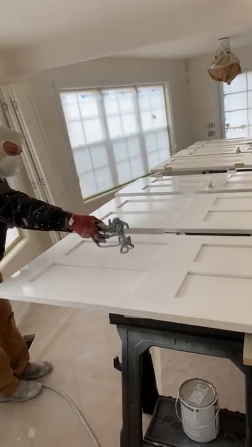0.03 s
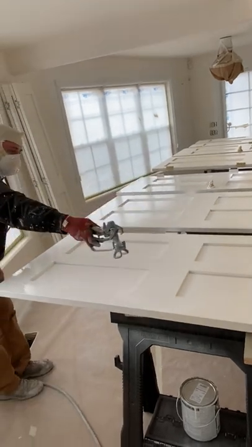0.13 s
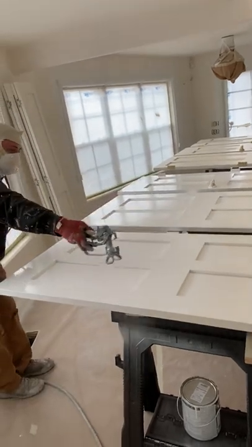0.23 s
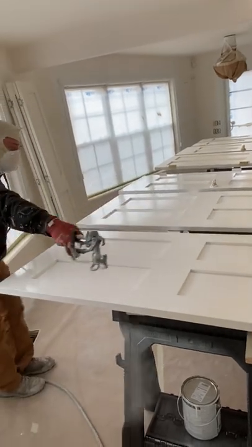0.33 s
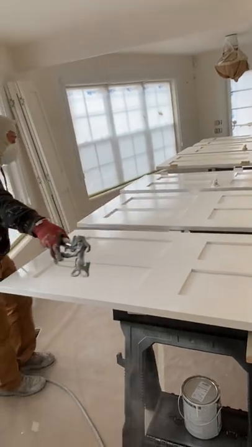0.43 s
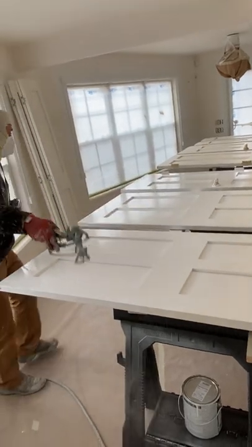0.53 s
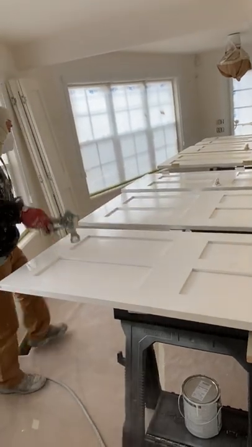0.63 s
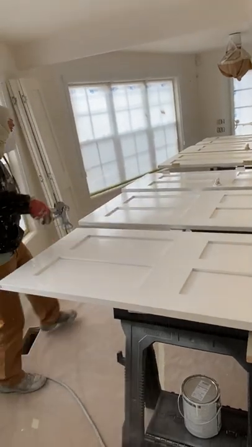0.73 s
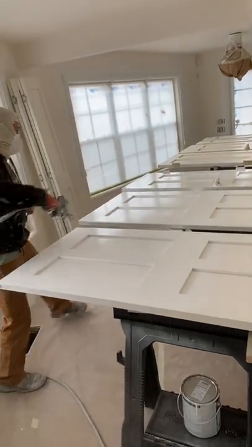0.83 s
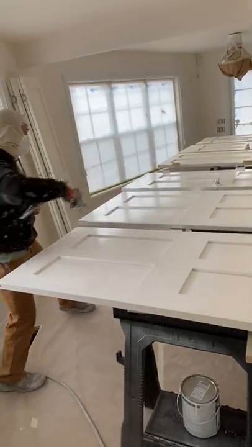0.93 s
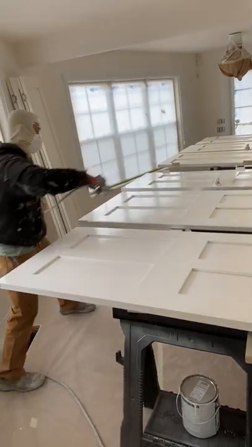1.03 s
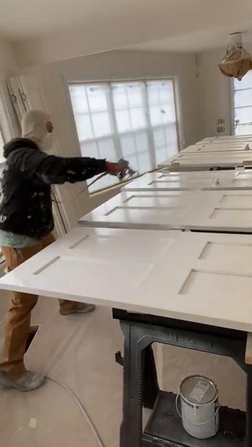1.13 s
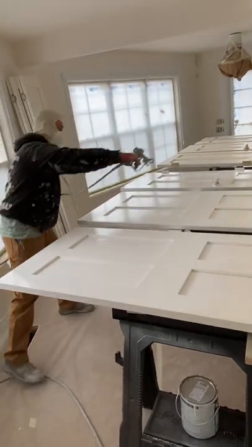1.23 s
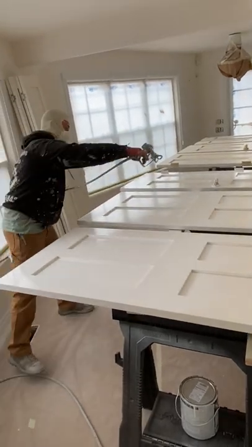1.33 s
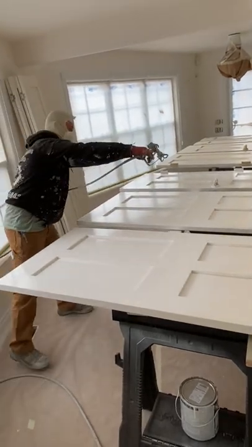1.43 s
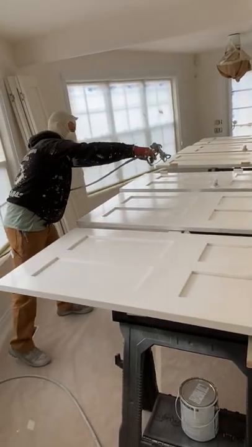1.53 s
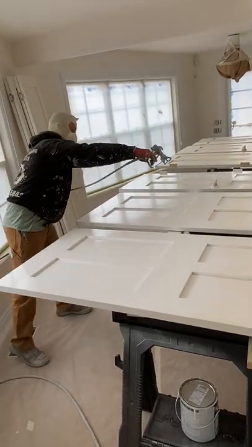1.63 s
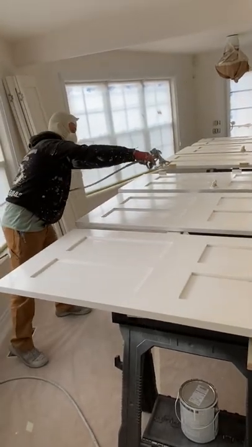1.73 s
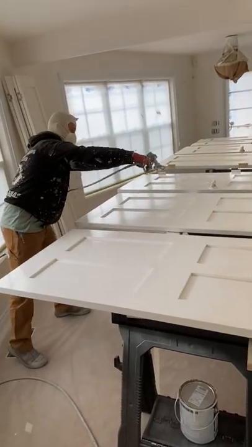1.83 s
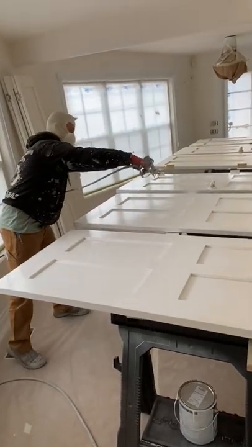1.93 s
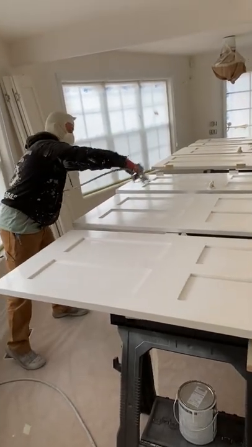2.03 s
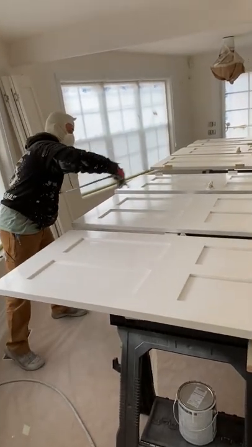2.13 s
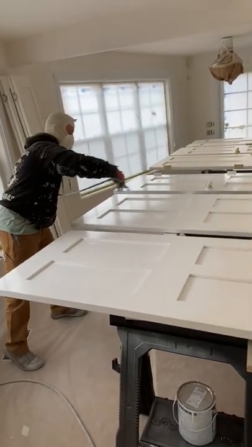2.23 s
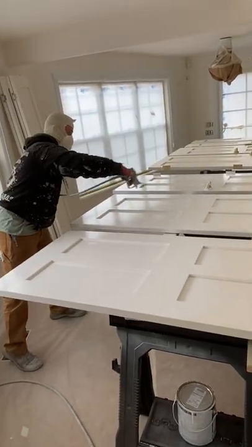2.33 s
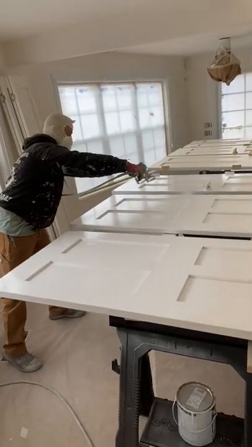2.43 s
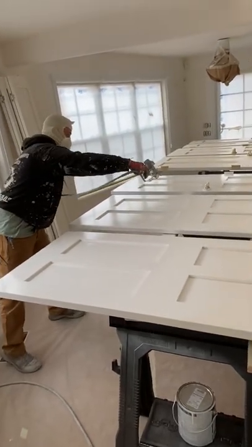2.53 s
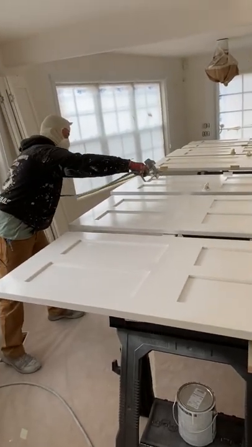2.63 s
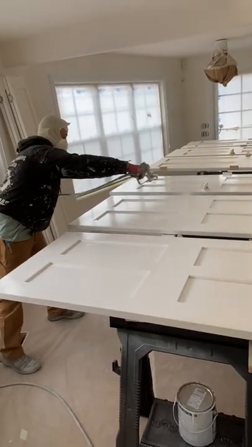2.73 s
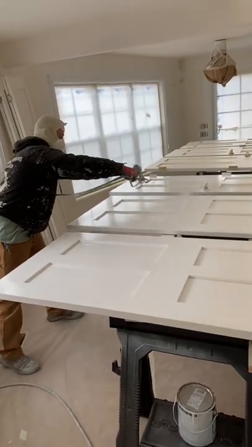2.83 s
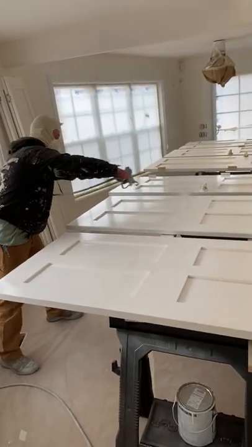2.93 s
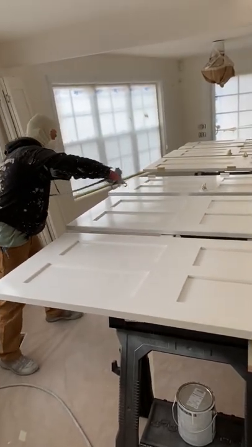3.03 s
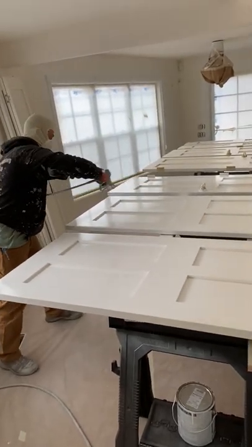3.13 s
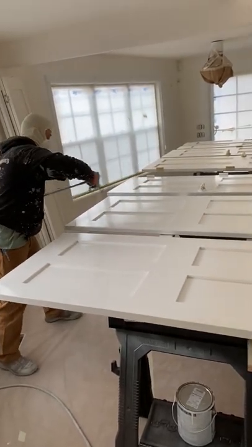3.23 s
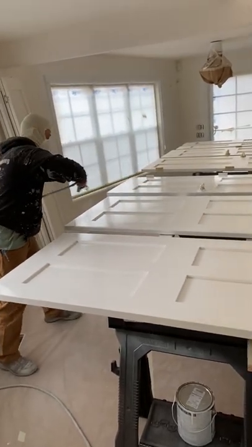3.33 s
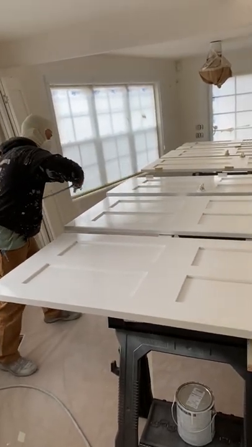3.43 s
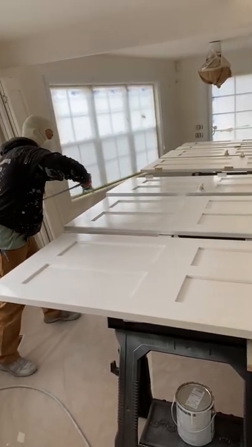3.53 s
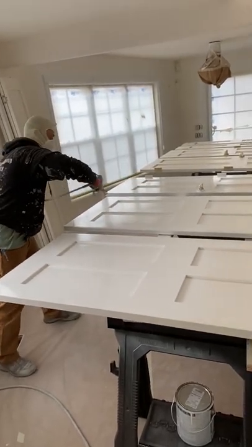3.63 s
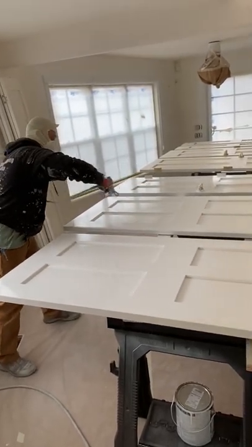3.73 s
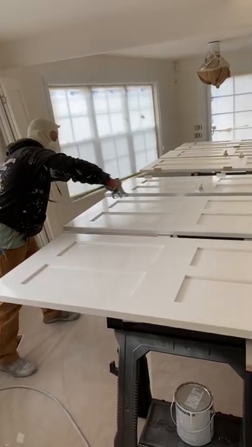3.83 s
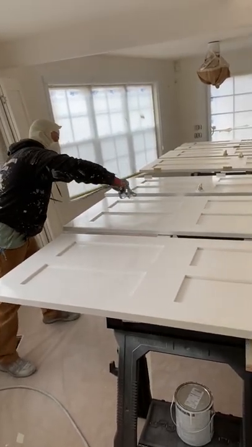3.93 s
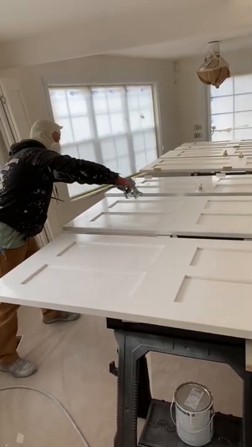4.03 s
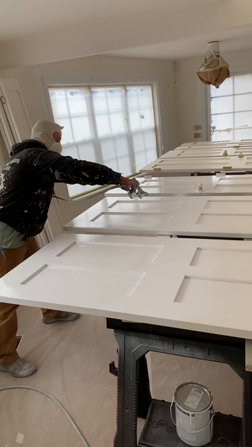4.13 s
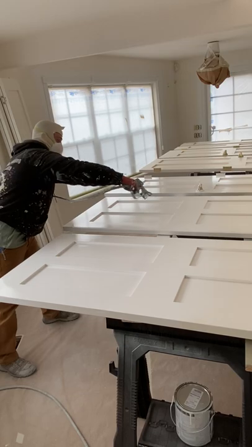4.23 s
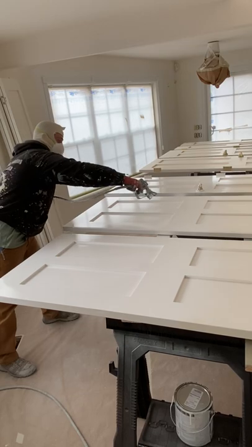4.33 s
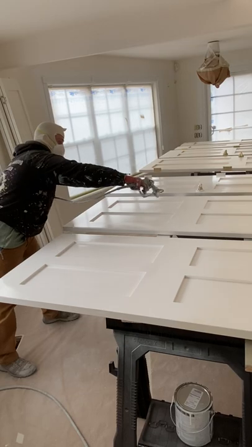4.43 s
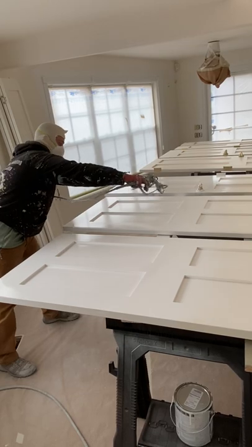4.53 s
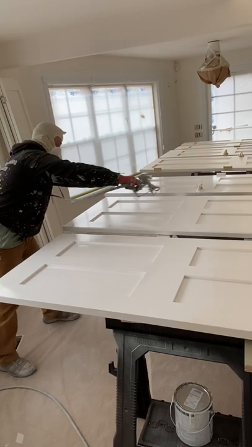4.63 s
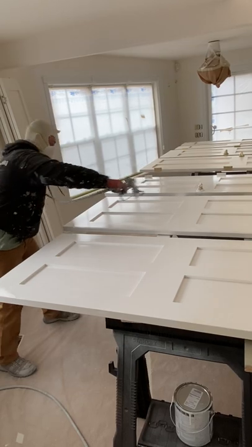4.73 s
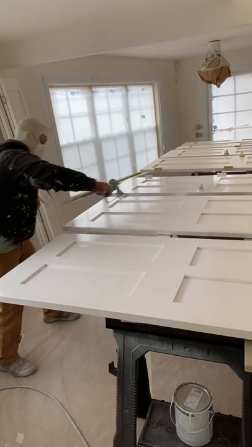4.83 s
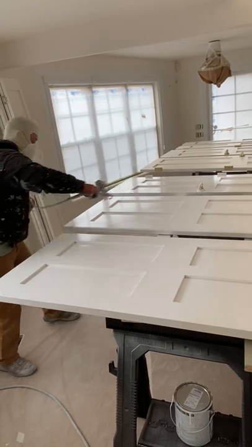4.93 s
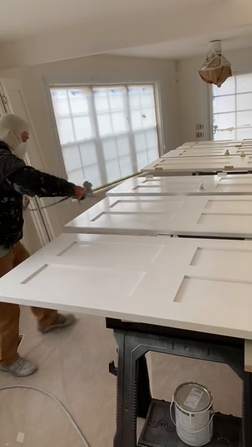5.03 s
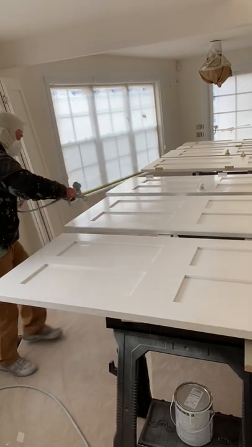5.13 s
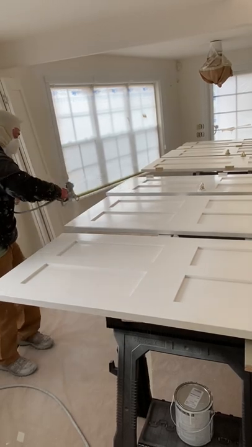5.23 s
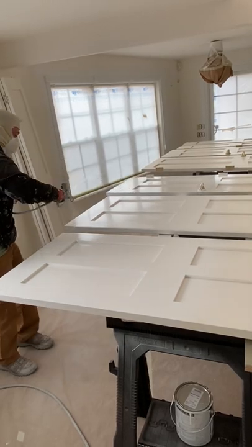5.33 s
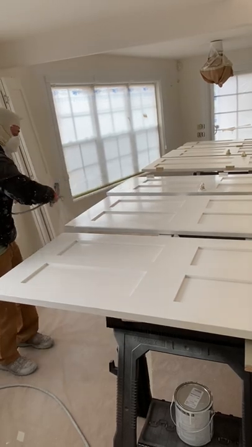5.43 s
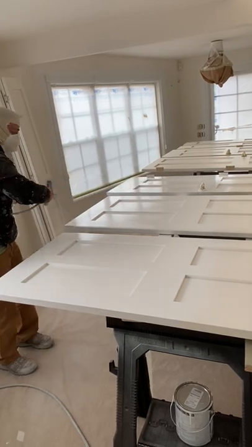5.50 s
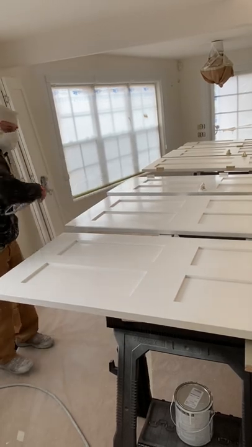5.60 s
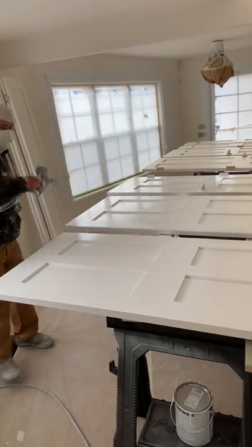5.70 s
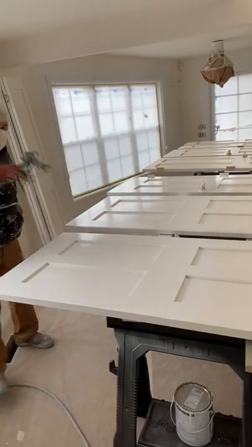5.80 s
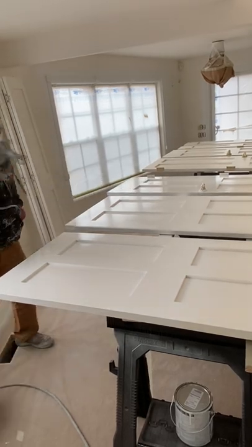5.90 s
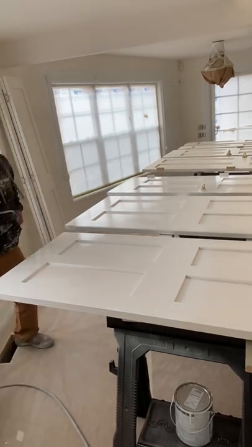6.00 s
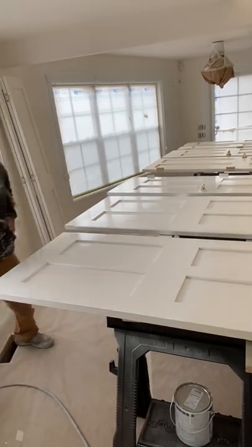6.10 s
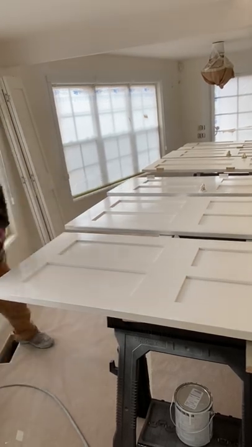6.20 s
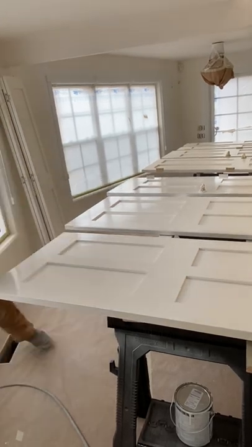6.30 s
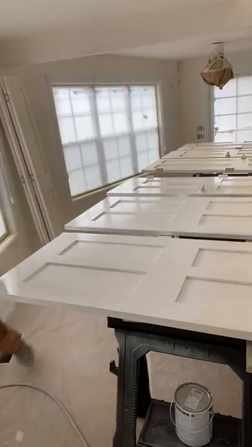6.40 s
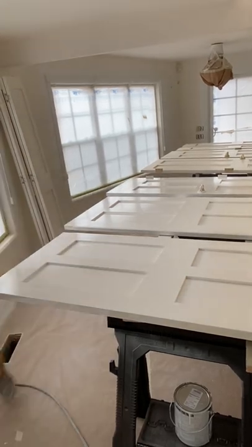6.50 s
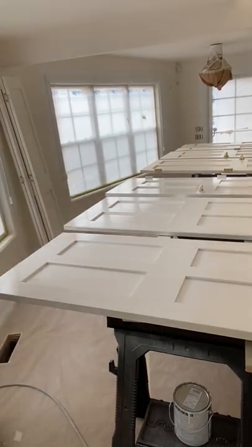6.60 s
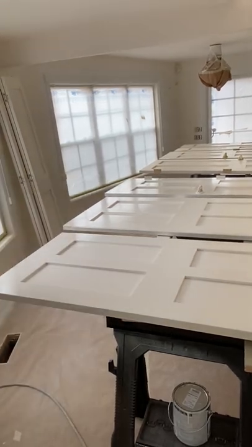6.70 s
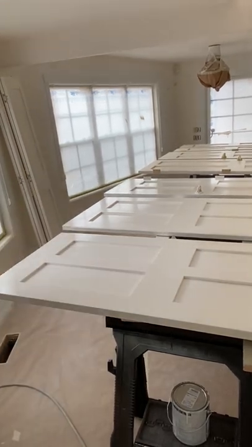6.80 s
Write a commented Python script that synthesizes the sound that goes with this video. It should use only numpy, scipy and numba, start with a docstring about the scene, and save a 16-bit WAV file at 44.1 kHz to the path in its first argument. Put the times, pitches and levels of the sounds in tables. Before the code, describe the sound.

A worker spray-paints doors laid on trestles. A brief airy hiss stops, giving way to low boot thumps, scraping soles, clicks and papery rustling. The gun then hisses steadily in three pulls of about a second or less, fluttering slightly and ringing briefly off the walls. Afterwards come falling hose swishes, thuds and ticks over faint room air, heard in stereo from a few metres.

```python
"""An airless spray gun sweeps over doors on trestles in a bare room, a few metres from a two-port microphone.
The fan of paint is turbulent noise with droplet grains, heard while the trigger is held. Boots thud as sagging
tones with floor modes; soles and hose scuff as dense grains, paper and cloth rustle as lighter ones.
Ticks are noise through a resonance, swishes are noise in sliding bands, over a bed of room air.
The hard walls ring on after the spray, the thuds and the ticks."""
import sys
import numpy as np
from scipy import signal
from scipy.fft import rfft, irfft
from scipy.io import wavfile
from scipy.ndimage import uniform_filter1d
from numba import njit

SR = 44100
rng = np.random.default_rng(int(sys.argv[2]) if len(sys.argv) > 2 else 0)


def write(x):
    x = np.atleast_2d(x).T
    wavfile.write(sys.argv[1], SR, np.round(np.clip(x, -1, 1) * 32767).astype(np.int16))


N = 302526
T = np.arange(N) / SR  # time [s]

# how long the bare room rings at each pitch: (pitch [Hz], t60 [s])
ROOM_DECAY = [(60, 0.19), (500, 0.48), (1500, 0.55), (3500, 0.53), (9000, 0.35), (16000, 0.19)]


def undb(db):
    """Amplitude ratio of a level in dB."""
    return 10 ** (np.asarray(db) / 20)


def unit(x):
    """Scale x to rms 1."""
    return x / np.sqrt(np.mean(x ** 2))


def along(table, hz):
    """Columns of a table of spectra, read on a log-frequency axis."""
    f, *columns = np.transpose(table)
    return [np.interp(np.log(hz + 1), np.log(f), c) for c in columns]


def half_octave(hz, mid_hz):
    """Triangular share of one band, falling to nothing half an octave either side."""
    return np.clip(1 - 2 * abs(np.log2(hz / mid_hz)), 0, 1)


def colour(x, table):
    """Shape the spectrum of x by a table of (pitch [Hz], level [dB]), rms 1."""
    hz = np.fft.rfftfreq(len(x), 1 / SR)
    return unit(irfft(rfft(x) * undb(along(table, hz)[0]), len(x)))


def walk(rate):
    """Random levels held 1 / rate s and slewed twice; spread near 1."""
    k = int(SR / rate)
    held = np.repeat(rng.standard_normal(N // k + 1), k)
    slewed = uniform_filter1d(uniform_filter1d(held, k), k)
    return 1.15 * slewed[:N]


def grit(rate, spread_db):
    """Random grains at a mean rate per second, many small and a few large."""
    size_db = np.clip(rng.exponential(size=N), 0, 3) * spread_db
    struck = rng.random(N) < rate / SR
    return struck * np.tanh(rng.standard_normal(N)) * undb(size_db)


def hiss(table, grains=0):
    """Three unrelated hearings of a coloured noise, with shared grains in it."""
    return np.array([colour(rng.standard_normal(N) + grains, table) for _ in range(3)])


def ripple(x):
    """Random fine peaks and dips in the noise, shifting about every fifth of a second."""
    spread_db = 3.5  # spread of the peaks and dips
    z = signal.stft(x, nperseg=1024)[2]
    # averaging 16 frames shrinks the spread to a quarter; the 4 restores it
    bumps = uniform_filter1d(rng.standard_normal(z.shape[1:]), size=16, axis=1) * 4
    return unit(signal.istft(z * undb(spread_db * bumps), nperseg=1024)[1][:, :N])


def swells(rows, level_db, entry_db, fall_db_s):
    """Gain of gestures that enter softly, swell, hold and fade at a steady rate; their energies add."""
    power = 0
    for (s, rise, hold, *_), db in zip(rows, level_db):
        after = np.clip(T - s - rise - hold, 0, None)
        shape_db = entry_db * np.clip(1 - (T - s) / rise, 0, 1) - fall_db_s * after
        power = power + (T >= s) * undb(db + shape_db) ** 2
    return np.sqrt(power)


def add(out, s, x):
    """Lay x into out from time s on."""
    i = int(s * SR)
    out[i:i + len(x)] += x[:N - i]


@njit
def svf(x, hz, damp):
    """State-variable band-pass whose centre may move every sample; damp is its width over its pitch."""
    y, b, l = np.empty(len(x)), 0., 0.
    for i in range(len(x)):
        g = np.tan(np.pi * hz[i] / SR)
        v = (b + g * (x[i] - l)) / (1 + g * (g + damp))
        b, l, y[i] = 2 * v - b, l + 2 * g * v, damp * v
    return y


def fade(hz):
    """One second of the room's decay at this pitch, energy 1."""
    t = np.arange(SR) / SR
    fall = undb(-60 * t / along(ROOM_DECAY, hz)[0]) * np.clip(t / 0.002, 0, 1)
    return fall / np.sqrt(np.sum(fall ** 2))


def trigger():
    """Gain and brightness of the jet as the valve opens, spits and shuts."""
    # trigger pulls: (opens [s], shuts [s], level at opening [dB], level at shutting [dB],
    #                 brightness [dB per octave], extra level of the opening spit [dB])
    pulls = [(0.0, 0.341, -27, -25, 1.5, 0), (2.655, 3.381, -24, -27.5, 1.65, 4),
             (3.492, 4.483, -27, -26, 1, 1), (4.642, 5.517, -25, -27, 0.75, 15.5)]
    open_s, shut_s, spit_s = 0.0016, 0.012, 0.0027  # opening ramp; time constants of closing and spit
    spit_bright = 1  # brightness gained per dB of spit
    gain, bright_db = np.zeros(N), np.zeros(N)
    for opens, shuts, first_db, last_db, tilt_db, spit_db in pulls:
        # a pull that starts at zero is already open
        opened = np.clip((T - opens) / open_s + (opens == 0), 0, 1)
        valve = opened * np.exp(-np.clip(T - shuts, 0, None) / shut_s)
        spit = spit_db * np.exp(-np.clip(T - opens, 0, None) / spit_s)
        level_db = np.interp(T, (opens, shuts), (first_db, last_db))
        gain += valve * undb(level_db + spit)
        bright_db += valve * (tilt_db + spit_bright * spit)
    return gain, bright_db


def spray():
    """Paint tearing into mist: fluttering turbulence with droplets; moving gun stirs echoes, so energies add."""
    # colour of the jet: (pitch [Hz], level per Hz [dB])
    jet_colour = [(500, -26), (1000, -26), (1600, -23.5), (2500, -14), (3500, -12.5), (4800, -8),
                  (5500, -9), (6500, -6.5), (8000, -4), (10000, -3.3), (11500, -2), (12700, -3),
                  (13600, -9), (15500, -11)]
    flutter_db, drops_db, far_wet_db = 1.33, -16.5, 8  # flutter spread; droplets to noise; echoes to direct
    gain, bright_db = trigger()
    droplets = undb(drops_db) * unit(grit(600, 1.6))
    mist = rfft(ripple(hiss(jet_colour, droplets)))
    hz = np.clip(np.fft.rfftfreq(N, 1 / SR), 500, 16000)
    wet = undb(2 * far_wet_db)  # as an energy ratio
    out = 0
    for mid_hz in 500 * 2. ** np.arange(5.5, step=.5):
        # the angle of the fan to the door tilts the spectrum about 8 kHz
        tilt_db = bright_db * np.log2(mid_hz / 8000)
        power = (gain * undb(tilt_db + flutter_db * walk(14))) ** 2
        before = np.full(SR, power[0])  # the room is already full of echoes at the start
        echo = signal.fftconvolve(np.r_[before, power], fade(mid_hz) ** 2)[SR:SR + N]
        heard = (power + wet * np.clip(echo, 0, None)) / (1 + wet)
        out = out + irfft(mist * half_octave(hz, mid_hz), N) * np.sqrt(heard)
    return out


def drag():
    """Rubbing as dense grains through the floor cover; the boards hum under the moving weight."""
    # soles and hose scuffing the floor cover:
    # (starts [s], swells for [s], holds for [s], scrape level [dB], board hum level [dB])
    scuffs = [(0.297, 0.058, 0.07, -48, -50.5), (0.566, 0.036, 0.037, -55, -40),
              (1.009, 0.018, 0.22, -44.5, -45), (1.444, 0.032, .02, -62, -51),
              (1.571, 0.052, .02, -54.5, -54.5), (1.731, 0.042, .03, -62, -51),
              (2.248, 0.041, 0.052, -64.5, -69.5), (2.645, 0.014, .02, -56.5, -58),
              (3.342, 0.012, .02, -51.5, -59.5), (3.51, 0.061, .02, -63, -54.5),
              (4.153, 0.17, .16, -54.5, -51), (4.853, 0.17, 0.028, -44.5, -49),
              (5.222, 0.12, .16, -46, -49), (5.628, 0.034, 0.034, -40.5, -47.5),
              (6.09, 0.033, .04, -47, -56), (6.163, 0.033, 0.022, -41.5, -37),
              (6.274, 0.021, 0.02, -46.5, -53)]
    # steady shuffling under the scuffs: (time [s], scrape level [dB], board hum level [dB])
    shuffle = [(0, -57, -58.5), (.7, -55, -56), (.97, -58, -58), (1.8, -67.5, -60.5), (2.2, -79, -66),
               (2.65, -68, -64.5), (2.8, -65.5, -61.5), (3.9, -67.5, -63.5), (4.8, -66.5, -58.5),
               (5.85, -49.5, -56), (6.08, -51, -60), (6.45, -49.5, -56.5), (6.86, -53, -56)]
    # colour of the scrape: (pitch [Hz], level per Hz [dB])
    scrape_colour = [(88, -33), (150, -10), (322, -3.5), (463, -3.5), (737, -4.5), (878, -6), (1470, -10),
                     (2360, -14), (3000, -17), (3900, -47.5), (6600, -120)]
    # colour of the humming boards: (pitch [Hz], level per Hz [dB])
    hum_colour = [(12, -64.5), (20, -24.5), (32, -16), (64, 2), (231, -12.5), (265, -9), (300, -16.5),
                  (390, -17.5), (660, -120)]
    entry_db, scrape_fall_db_s, hum_fall_db_s = -12, 62.5, 89  # start below full swell; fading rates
    s, steady_db, steady_hum_db = np.transpose(shuffle)
    scrape_db, hum_db = np.transpose(scuffs)[3:]
    scuff_rub = swells(scuffs, scrape_db, entry_db, scrape_fall_db_s)
    scuff_hum = swells(scuffs, hum_db, entry_db, hum_fall_db_s)
    rub = np.hypot(undb(np.interp(T, s, steady_db)), scuff_rub)
    hum = np.hypot(undb(np.interp(T, s, steady_hum_db)), scuff_hum)
    grains = 0.24 * unit(grit(400, 3.6))
    scrape = ripple(hiss(scrape_colour, grains)) * rub * undb(1.28 * walk(24))
    return scrape + hiss(hum_colour) * hum


def air():
    """The quiet bed of the room: coloured noise whose level wanders slowly."""
    # colour of the room air: (pitch [Hz], level per Hz [dB])
    air_colour = [(18, -39), (30, 5), (117, -8.5), (193, -17), (368, -3), (434, -25.5), (526, 0),
                  (717, -23), (1330, -25), (5580, -21.5), (9000, -44.5), (11700, -79.5), (19800, -120)]
    air_db = -66
    return hiss(air_colour) * undb(air_db + walk(2.2))


def rustle():
    """Paper and cloth crinkling as grains, one swell for each move."""
    # moves: (starts [s], swells for [s], holds for [s], level [dB])
    moves = [(0.5, .05, 0.51, -55), (1.015, 0.12, .02, -46.5), (1.19, .05, 0.06, -56),
             (1.59, .004, 0.04, -51), (1.75, 0.0092, .02, -55.5), (5.698, 0.07, 0.057, -53),
             (5.85, .05, 0.16, -62), (6.09, .03, 0.055, -49.5), (6.161, 0.067, .02, -39.5),
             (6.5, .07, 0.38, -62.5)]
    # colour of the crinkling: (pitch [Hz], level per Hz [dB])
    crinkle_colour = [(900, -29.5), (2000, -4.5), (3200, 4), (5000, -4), (8000, -11), (12000, -15),
                      (16000, -52)]
    entry_db, fall_db_s = -2, 73.5  # start below full swell; fading rate
    gain = swells(moves, np.transpose(moves)[3], entry_db, fall_db_s)
    grains = 0.38 * unit(grit(600, 1.7))
    return hiss(crinkle_colour, grains) * gain * undb(2 * walk(25))


def thuds():
    """A boot or a small knock pushes the boards: a tone that sags as it settles, then the modes of the floor."""
    # boots on the boards, and one small higher knock:
    # (time [s], level [dB], first pitch [Hz], settled pitch [Hz], rise [s], ring t60 [s])
    blows = [(0.579, -25.5, 175, 114, 0.0093, 0.072), (0.618, -40, 65.4, 52, 0.026, 0.57),
             (1.019, -29.5, 80, 70.4, 0.024, 0.26), (1.11, -31.5, 82, 72, 0.0093, 0.16),
             (1.605, -41.5, 108, 80, 0.017, 0.23), (1.732, -32, 131, 100, 0.02, 0.12),
             (2.106, -54, 516, 510, 0.0039, 0.056), (3.396, -43.5, 80, 70, 0.0084, .2),
             (3.55, -43.5, 76, 65, .012, 0.17), (3.925, -43.5, 119, 100, 0.022, 0.11),
             (4.25, -38, 169, 90, 0.0456, 0.42), (5.33, -44, 73, 63, 0.065, 0.33),
             (5.652, -32, 128, 92.6, 0.0075, 0.33), (6.179, -24.5, 96, 75, 0.029, 0.15),
             (6.27, -36, 93, 80, 0.0095, 0.34), (6.362, -38, 96.6, 80, 0.011, 0.16)]
    # modes of the floor: (pitch [Hz], level against the tone [dB], t60 [s])
    floor_modes = [(54, -26, 0.87), (80, -22, 0.17), (229.5, -8.5, 0.2), (430, -18.5, 0.2)]
    out, t = np.zeros(N), np.arange(SR // 2) / SR
    phases = rng.random((len(blows), len(floor_modes)))  # in turns
    for (s, db, hz, end_hz, rise, t60), turns in zip(blows, phases):
        sagging_hz = end_hz + (hz - end_hz) * np.exp(-t / (1.8 * rise))
        push = np.sin(np.pi / 2 * np.clip(t / rise, 0, 1)) ** 2
        x = np.sin(2 * np.pi * np.cumsum(sagging_hz) / SR)
        x *= undb(-60 * np.clip(t - rise, 0, None) / t60)
        for (mode_hz, mode_db, mode_t60), turn in zip(floor_modes, turns):
            x += undb(mode_db - 60 * t / mode_t60) * np.sin(2 * np.pi * (mode_hz * t + turn))
        add(out, s, undb(db) * push * x)
    return out


def ticks():
    """Short cracks: a snap and a burst of noise through one broad resonance, then the walls answer."""
    # ticks of hose, trigger and grit: (time [s], peak level [dB], centre pitch [Hz])
    cracks = [(0.618, -27.5, 3970), (1.0135, -31.5, 790), (1.141, -22, 3200), (1.1535, -27.5, 3500),
              (1.4574, -43.5, 7000), (1.5975, -37.5, 4050), (1.7675, -28, 3750), (1.9881, -45, 1120),
              (2.592, -39.5, 5200), (6.0842, -34.5, 3450), (6.1068, -30, 750), (6.121, -30.5, 5460),
              (6.1609, -32, 3200), (6.179, -20.5, 3500), (6.3095, -29, 1160), (6.338, -28.5, 2730),
              (6.83, -36.5, 1450)]
    burst_s, damp, tail_db = 0.0028, 1.75, -13  # burst time constant; width over pitch; walls to burst
    out, t = np.zeros((3, N)), np.arange(SR // 2) / SR
    for s, db, hz in cracks:
        tail = undb(tail_db - 60 * t / along(ROOM_DECAY, hz)[0])
        centre = np.full(len(t), 1. * hz)
        for heard in out:
            noise = rng.standard_normal(len(t))
            snap = 1.6 * (t == 0)
            burst = noise * (np.exp(-t / burst_s) + tail) + snap
            crack = svf(svf(burst, centre, damp), centre, damp)
            add(heard, s, undb(db) * crack / abs(crack).max())
    return out


def swishes():
    """Hose rubbing across the floor: noise in a band that slides as the hose slows; a trestle rings along."""
    # swishes, nearly all falling in pitch:
    # (time [s], level [dB], start pitch [Hz], end pitch [Hz], length [s], band width over pitch [ratio])
    strokes = [(1.009, -49.5, 2820, 600, 0.11, 1.1), (3.354, -53, 1100, 506, 0.062, 1.3),
               (4.157, -49, 600, 620, 0.27, 0.33), (4.977, -32, 3200, 1300, 0.031, 1.7),
               (5.007, -46.5, 600, 420, 0.059, .8), (5.553, -26, 4120, 1900, 0.063, 1.44),
               (5.645, -34, 597, 356, 0.08, 1.15)]
    trestle_hz, trestle_width_hz, trestle_db = 441, 18, 5.5
    out, t = np.zeros((3, N)), np.arange(SR // 2) / SR
    for s, db, start_hz, end_hz, length, width in strokes:
        hz = end_hz * (start_hz / end_hz) ** np.clip(1 - t / length, 0, 1)
        # a quick onset, a slow sag, then 60 dB more in 0.68 s
        fall_db = -4 * t / length - 60 * np.clip(t - length, 0, None) / 0.68
        shape = np.clip(t / 0.0039, 0, 1) * undb(fall_db)
        for heard in out:
            band = svf(rng.standard_normal(len(t)), hz, width)
            even = band / np.sqrt(np.pi * 1.1 * hz / SR)  # a higher band lets more noise through
            add(heard, s, undb(db) * shape * even)
    centre = np.full(N, 1. * trestle_hz)
    ring = [svf(x, centre, trestle_width_hz / trestle_hz) for x in out]
    return out + undb(trestle_db) * np.array(ring)


def room(x, wet_db):
    """Three unrelated hearings of the room; each half octave of the tail dies at its own pace."""
    hz = np.fft.rfftfreq(SR, 1 / SR)
    tails = 0
    for mid_hz in 44 * 2. ** np.arange(9.5, step=.5):
        noise = rfft(rng.standard_normal((3, SR)))
        tails = tails + irfft(noise * half_octave(hz + 1, mid_hz)) * fade(mid_hz)
    # the first arrival: plain in the shared hearing,
    # smeared over about two milliseconds with random phases in the other two
    first = irfft(np.exp(2j * np.pi * rng.random((3, 49))))
    first[0] = np.arange(96) == 0
    tails *= undb(wet_db)
    tails[:, :96] += first
    return signal.fftconvolve(x[None], tails, axes=1)[:, :N] / np.sqrt(1 + undb(2 * wet_db))


def ports(shared, left, right):
    """Both microphone ports hear a shared part, offset in phase and level, and each a part of its own."""
    # the two ports: (pitch [Hz], likeness [0-1], nominal left lead [rad], nominal left minus right [dB])
    port_pairing = [(60, 0.99, -0.1, -1.4), (200, 0.95, -0.2, -3.0), (380, 0.83, -0.2, -7.1),
                    (600, 0.54, 1.2, -4.9), (900, 0.49, 0.9, 0.5), (1250, 0.66, 0.2, 0.4),
                    (1650, 0.82, 0.3, 0.3), (2100, 0.5, 1.5, -0.9), (2800, 0.29, 3.2, -0.2),
                    (3500, 0.27, 5.7, -0.5), (4200, 0.24, 6.9, -2.0), (4900, 0.44, 10.2, -2.3),
                    (5500, 0.6, 12.9, -1.0), (6300, 0.61, 13.4, -0.3), (7500, 0.87, 13.9, 0.2),
                    (10000, 0.89, 14.6, 0.7), (13000, 0.93, 15.6, -0.2), (13600, 1.0, 15.7, 0.0)]
    alike, lead, pan_db = along(port_pairing, np.fft.rfftfreq(N, 1 / SR))
    alike = np.clip(alike, 0, 1)
    heard = []
    # each port takes about half of the lead and of the level difference
    for way, own in ((0.98, left), (-1.008, right)):
        common = np.sqrt(alike) * np.exp(.5j * way * lead) * rfft(shared)
        private = np.sqrt(1 - alike) * rfft(own)
        heard.append(irfft((common + private) * undb(way * pan_db / 2), N))
    return np.array(heard)


def scene():
    """All layers in three hearings (shared, left, right), brought to the two ports."""
    board_wet_db = -4.5  # room tail against the thuds themselves
    layers = spray() + drag() + air() + rustle()
    layers = layers + room(thuds(), board_wet_db) + ticks() + swishes()
    return ports(*layers)


def record(dry):
    """Steep low-passes: the sum of the two ports is cut lower than their difference."""
    sum_top_hz, difference_top_hz = 13080, 15700

    def cut(x, hz):
        """Elliptic low-pass run forwards and backwards, so nothing is delayed."""
        return signal.sosfiltfilt(signal.ellip(12, .1, 50, hz, fs=SR, output="sos"), x)

    both = cut(dry[0] + dry[1], sum_top_hz)
    apart = cut(dry[0] - dry[1], difference_top_hz)
    return np.array([both + apart, both - apart]) / 2


dry = scene()
out = record(dry)
write(out)
```